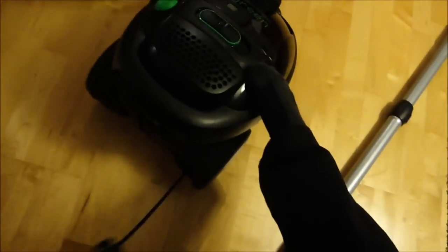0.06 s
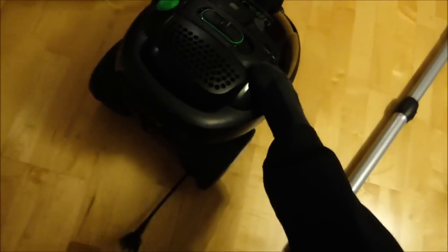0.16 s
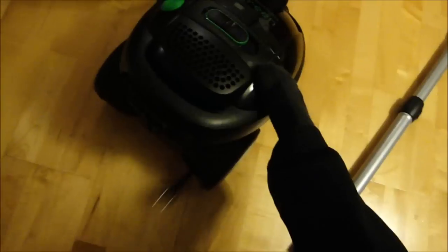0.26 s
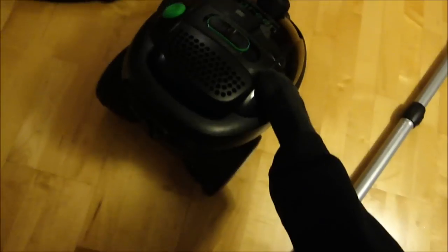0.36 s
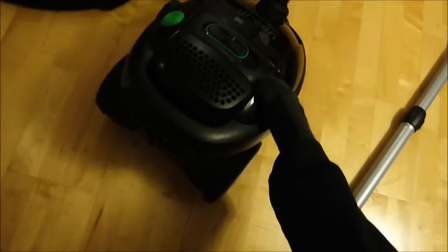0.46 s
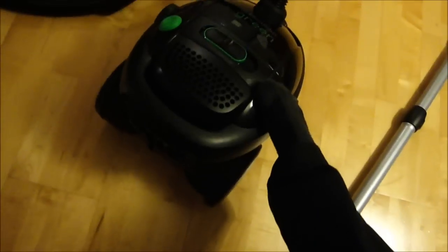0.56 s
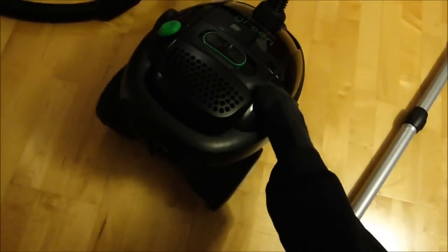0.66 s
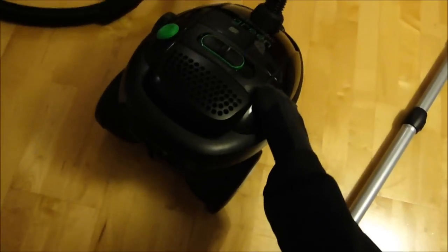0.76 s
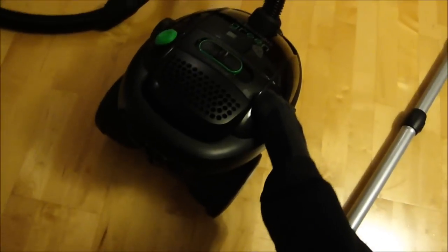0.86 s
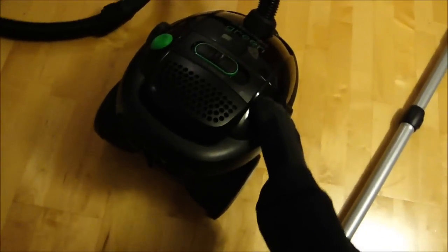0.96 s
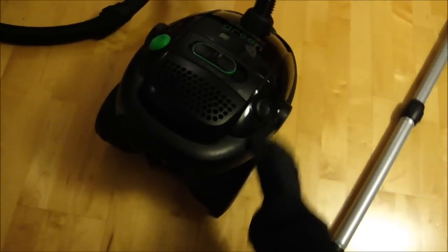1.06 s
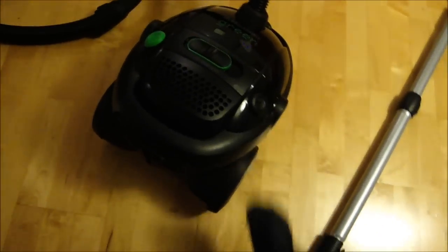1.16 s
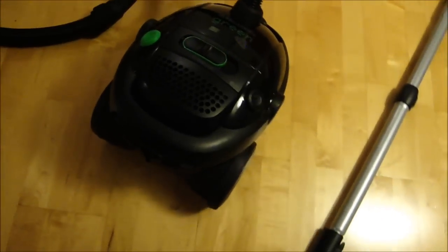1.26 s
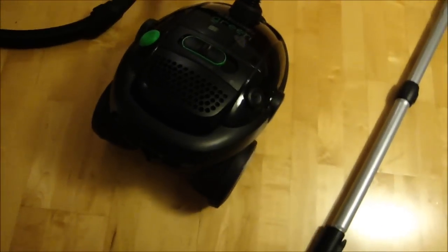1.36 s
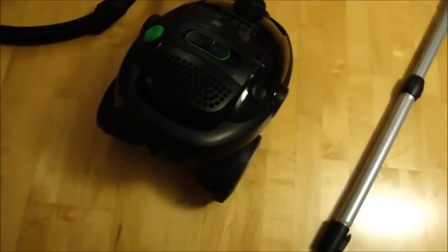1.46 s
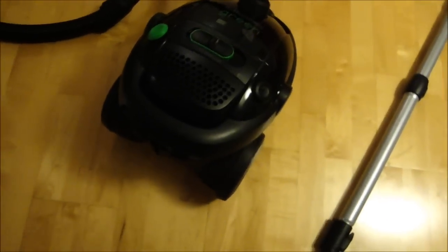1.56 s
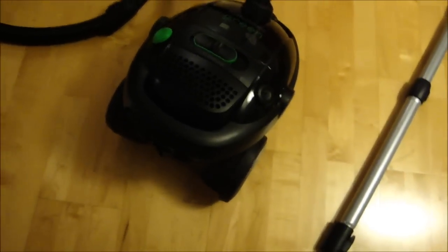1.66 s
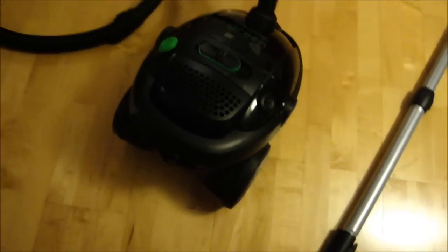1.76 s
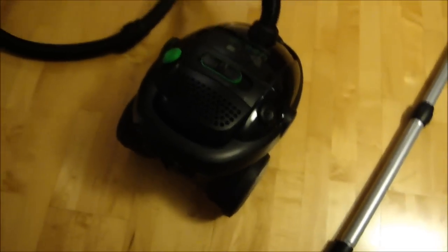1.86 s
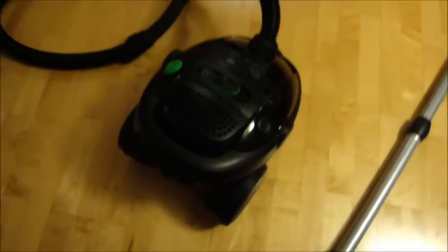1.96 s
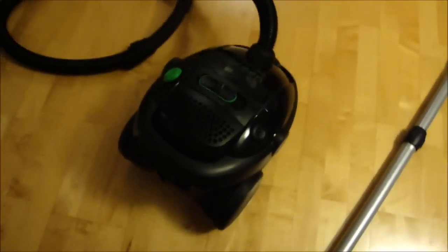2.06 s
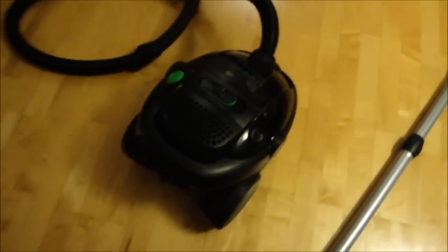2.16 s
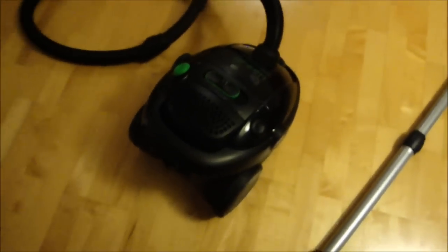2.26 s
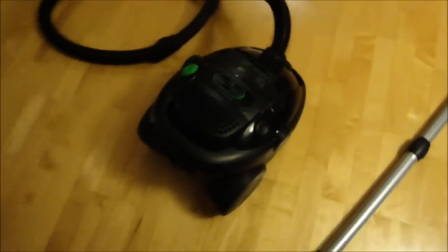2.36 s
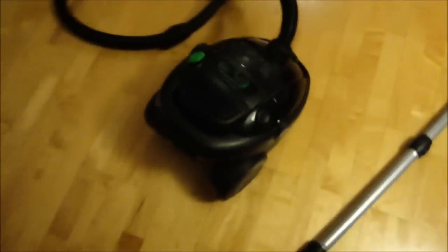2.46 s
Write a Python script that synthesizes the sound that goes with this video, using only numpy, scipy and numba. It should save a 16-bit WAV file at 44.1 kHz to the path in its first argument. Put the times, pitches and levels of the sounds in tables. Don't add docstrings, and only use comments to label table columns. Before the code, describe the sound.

A vacuum cleaner cord's last length scrapes over plastic, its plug knocking lightly on wood from 0 to 0.2 s. At 0.21 it slams home very loudly; the hollow shell shudders, with a sharp rebound cluster at 0.33-0.36, dying by 0.46 into room echo. Over steady hiss come faint lens ticking at 0.62-0.79 and 1.05-1.21, a soft pedal knock near 0.99, sparse clicks, and a close finger tap at 2.41.

```python
import sys
import numpy as np
from scipy import signal
from scipy.fft import rfft, irfft
from scipy.io import wavfile
from scipy.ndimage import uniform_filter1d
from numba import njit

SR = 44100
rng = np.random.default_rng(int(sys.argv[2]) if len(sys.argv) > 2 else 0)


def elevation(decibels):
    levels = np.asarray(decibels, float)
    return 10 ** (levels / 20)


def unload_wav(signal):
    wavfile.write(
        sys.argv[1],
        SR,
        np.round(np.clip(np.atleast_2d(signal).T, -1, 1) * 32767).astype(np.int16),
    )


N = 110250

# start_s, ring_db, ring_hz, crack_db, crack_s
SLAMS = [
    (.2083, 2, 610, -4, .0005),
    (.3286, -16, 800, -20, .003),
    (.3347, 2, 1150, -11, .002),
    (.3372, -2, 1450, -9, .004),
    (.342, -4, 700, -18, .002),
    (.3528, -5, 1700, -8, .003),
    (.355, -2, 950, -8, .003),
    (.3575, -3, 560, -16, .003),
]


def set_rms(x, db):
    return x * elevation(db) / np.sqrt(np.mean(x ** 2))


def band(x, hz, width_hz):
    b, a = signal.iirpeak(min(hz, .45 * SR), hz / width_hz, fs=SR)
    return signal.lfilter(b, a, x)


def thin(x, low_hz):
    return signal.sosfilt(signal.butter(3, low_hz, "high", fs=SR, output="sos"), x)


def curve(rows):
    start_s, level_db = np.array(rows).T
    return elevation(np.interp(np.arange(N) / SR, start_s, level_db, left=-120, right=-120))


def walk(rate_hz):
    hold = int(SR / rate_hz)
    steps = np.repeat(rng.standard_normal(N // hold + 1), hold)
    return 0.61 * uniform_filter1d(uniform_filter1d(steps, hold), hold)[:N]


def add(out, start_s, x):
    i = int(start_s * SR)
    out[i:i + len(x)] += x[:N - i]


def chatter(rate_hz, rough_db, body, broad_db):
    draw = rng.random((3, N))
    sign = np.sign(draw[1] - .5)
    size = elevation(-rough_db * np.log(np.maximum(draw[2], .04)))
    clicks = (draw[0] < rate_hz / SR) * sign * size
    ring = np.zeros(N)
    for k, (hz, width_hz, db) in enumerate(body):
        ring += (-1) ** k * elevation(db) * band(clicks, hz, width_hz)
    broad = set_rms(band(clicks, 1480, 2000), broad_db)
    return set_rms(set_rms(ring, 0) + broad, 0)


def knocks(rows, cycles=2.1, crack_hz=2000, width_hz=3200):
    out = np.zeros(N)
    t = np.arange(int(.05 * SR)) / SR
    for start_s, ring_db, ring_hz, crack_db, crack_s in rows:
        onset = np.minimum(t * 8000, 1)
        ring = np.sin(2 * np.pi * ring_hz * t + np.pi / 4) * np.exp(-t * ring_hz / cycles) * onset
        burst = rng.standard_normal(len(t)) * np.exp(-(t / crack_s) ** 2)
        crack = band(band(burst, crack_hz, width_hz), crack_hz, 2 * width_hz)
        add(out, start_s, elevation(ring_db) * ring + elevation(crack_db) * crack)
    return out


def plug():
    # start_s, ring_db, ring_hz, crack_db, crack_s
    floor_knocks = [
        (.019, -32, 1800, -38, .006),
        (.1055, -28, 5300, -33, .006),
        (.1055, -23, 800, -30, .004),
        (.1462, -18, 1200, -23, .003),
        (.149, -15, 1550, -20, .003),
        (.153, -21, 900, -32, .003),
        (.178, -27, 1400, -33, .005),
        (.2175, -16, 700, -20, .003),
        (.3218, -11, 900, -19, .0015),
    ]
    return knocks(floor_knocks + SLAMS)


def slam_wash():
    # start_s, level_db
    swell = [
        (.211, -25),
        (.22, -18.5),
        (.27, -16.5),
        (.29, -20),
        (.328, -18),
        (.34, -28),
        (.372, -27),
        (.4, -21),
        (.46, -33),
    ]
    # pitch_hz, width_hz, level_db
    wash_body = [(523, 83, -0.5), (737, 183, -0.5), (953, 202, 1.5), (1240, 317, -5.5), (1780, 570, -10.5),
                 (2500, 2700, -29.5), (4670, 590, -57)]
    dense = chatter(rate_hz=5000, rough_db=2.5, body=wash_body, broad_db=-41)
    return curve(swell) * elevation(4.8 * walk(147.5)) * dense


def cord_scrape():
    # start_s, level_db
    scrape = [
        (0, -41),
        (.02, -36),
        (.066, -31),
        (.087, -30.5),
        (.093, -38),
        (.14, -38),
        (.16, -34.5),
        (.185, -34),
        (.206, -36),
    ]
    # pitch_hz, width_hz, level_db
    cord_body = [(635, 90, -4), (1080, 150, 2), (1720, 300, -5), (2020, 150, -7), (2400, 250, -11),
                 (3060, 350, -12), (3800, 700, -15), (4700, 600, -15)]
    rub = chatter(rate_hz=5000, rough_db=3, body=cord_body, broad_db=-1)
    return curve(scrape) * elevation(0.7 * walk(101)) * rub


def pedal_release():
    # start_s, level_db
    rustle = [
        (.93, -66),
        (.96, -44),
        (.98, -41.5),
        (1.0, -39),
        (1.02, -40.5),
        (1.04, -49),
        (1.09, -50.5),
    ]
    # start_s, ring_db, ring_hz, crack_db, crack_s
    pedal_hits = [
        (.977, -35, 650, -53, .002),
        (.988, -28, 622, -38, 0.0036),
        (.9925, -22, 640, -34, 0.0044),
        (1.035, -34.5, 685, -40.5, 0.0059),
    ]
    sole_body = [(352, 250, 2.5), (640, 320, 5.5), (7000, 7900, -21.5)]  # pitch_hz, width_hz, level_db
    rub = curve(rustle) * chatter(6000, 1.4, sole_body, broad_db=-8)
    return rub + knocks(pedal_hits, cycles=2.6, crack_hz=1500, width_hz=2800)


def floor_thump(near):
    return elevation(-7.5) * band(knocks(SLAMS[:1]) + elevation(-10) * near, 180, 260)


def room(x):
    # pitch_hz, t60_s
    decay = [(200, 0.46), (600, 0.29), (1500, 0.48), (4000, 0.43), (8000, 0.19), (11000, 0.075)]
    room_db, rise_s, tilt_db_per_octave = -9, 0.029, -1
    t = np.arange(int(.9 * SR)) / SR
    hz, t60_s = np.array(decay).T
    tail = np.zeros(len(t))
    for f in 150 * 2 ** np.arange(0, 6.6, .5):
        noise = set_rms(band(rng.standard_normal(len(t)), f, f / 2), 0)
        gain = np.sqrt(f) * elevation(tilt_db_per_octave * np.log2(f / 1000))
        tail += gain * noise * elevation(-60 * t / np.interp(np.log(f), np.log(hz), t60_s))
    tail *= 1 - np.exp(-(t / rise_s) ** 2)
    return signal.fftconvolve(x, tail * elevation(room_db) / np.sqrt(np.sum(tail ** 2)))[:N]


def tick(peak_db, hz, peak_s):
    t = np.arange(int(.01 * SR)) / SR
    return elevation(peak_db) * np.sin(2 * np.pi * hz * t) * (t / peak_s) * np.exp(1 - t / peak_s)


def camera():
    # start_s, ring_db, ring_hz, crack_db, crack_s
    finger_tap = [
        (2.4112, -28, 420, -24, .003),
        (2.4135, -28, 330, -26, .003),
        (2.4168, -23, 1100, -19, .002),
        (2.4188, -26, 550, -19, .004),
        (2.4245, -23, 1050, -21, .003),
        (2.427, -30, 320, -29, .006),
    ]
    # start_s, end_s, peak_db
    lens_runs = [
        (.6207, .79, -49),
        (1.054, 1.21, -47),
    ]
    # start_s, peak_db, pitch_hz
    body_clicks = [(.879, -38.5, 7000), (0.905, -48, 6000), (1.007, -35, 7400), (1.0352, -35, 9500),
                   (1.035, -35, 4950), (1.039, -34, 6650), (1.672, -45, 6000), (1.688, -42, 6250),
                   (1.99, -47, 5800), (2.0783, -36.5, 7200), (2.179, -48, 6000), (2.189, -35, 6400),
                   (2.417, -28.5, 5700), (2.4257, -33, 7300)]
    step_rate_hz, step_hz, scatter_db = 60, 6000, 2.5
    out = knocks(finger_tap, cycles=1.8, crack_hz=1600, width_hz=1400)
    for start_s, end_s, peak_db in lens_runs:
        for at_s in np.arange(start_s, end_s, 1 / step_rate_hz):
            db = peak_db + scatter_db * rng.standard_normal()
            hz = step_hz * (1 + 0.012 * rng.standard_normal())
            add(out, at_s, tick(db, hz, peak_s=.00046))
    for start_s, peak_db, hz in body_clicks:
        add(out, start_s, tick(peak_db, hz, peak_s=.00017))
    return out


def hiss():
    # pitch_hz, level_db (per Hz)
    spectrum = [(25, -36), (60, -20), (140, -5.5), (400, -0.5), (1050, -4.5), (1700, -7.5), (5000, -14.5),
                (11000, -19)]
    hz, db = np.array(spectrum).T
    f = np.arange(N // 2 + 1) * SR / N + 1
    gain = elevation(np.interp(np.log(f), np.log(hz), db))
    x = irfft(rfft(rng.standard_normal(N)) * gain, N)
    waver = elevation(0.4 * walk(5.24)) - 1
    return set_rms(x + band(x, 750, 900) * waver, -50)


def scene():
    hits, wash, cord, pedal = plug(), slam_wash(), cord_scrape(), pedal_release()
    direct = thin(hits + wash + cord + pedal, 306)
    echo = thin(room(hits + wash + elevation(-5.5) * cord + elevation(-11.5) * pedal), 238)
    return (direct + echo + floor_thump(hits + wash) + thin(camera(), 200) + hiss())[None]


@njit
def follow(x, release):
    e, out = 0., np.empty(len(x))
    for i in range(len(x)):
        e = max(abs(x[i]), e * release)
        out[i] = e
    return out


def gain_control(x):
    limit_db, release_s, ratio, makeup_db = -25, .15, 1.08, 0.5
    env = np.maximum(follow(x, np.exp(-1 / (release_s * SR))), elevation(limit_db))
    gain = (elevation(limit_db) / env) ** (1 - 1 / ratio)
    return x * uniform_filter1d(gain, size=441) * elevation(makeup_db)


def band_limit(x):
    return signal.sosfilt(signal.butter(12, 11950, fs=SR, output="sos"), x)


def record(dry):
    x = gain_control(dry[0])
    x = signal.sosfiltfilt(signal.ellip(8, .1, 55, 10920, fs=SR, output="sos"), x)
    return band_limit(np.clip(x, -1, 1)[None])


dry = scene()
out = record(dry)
unload_wav(out)
```